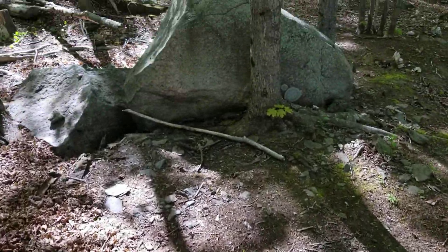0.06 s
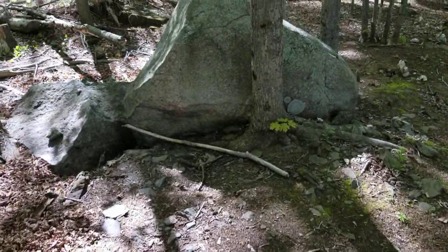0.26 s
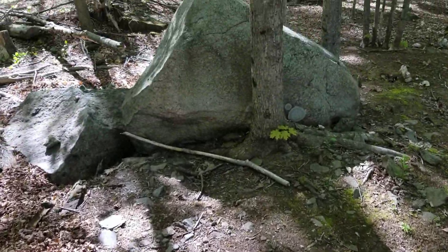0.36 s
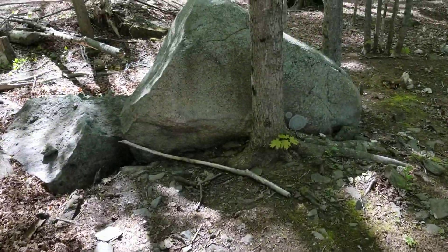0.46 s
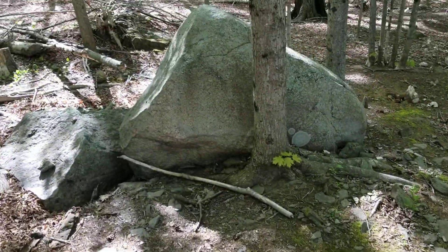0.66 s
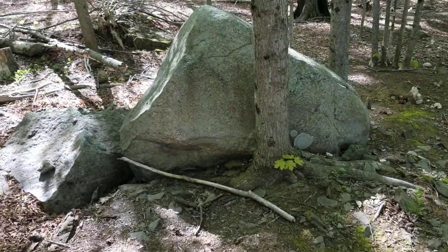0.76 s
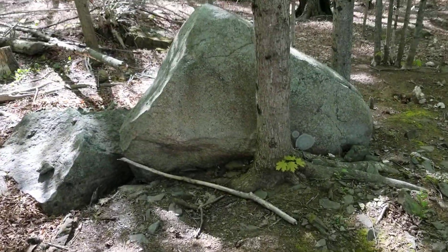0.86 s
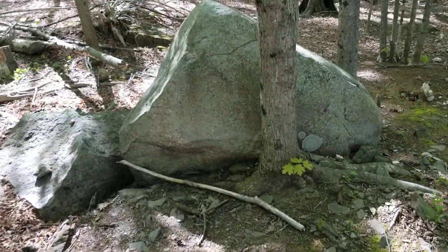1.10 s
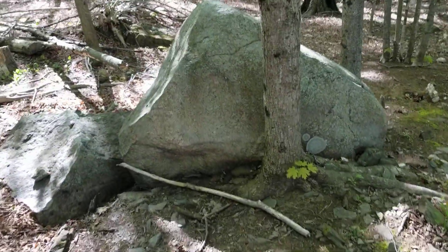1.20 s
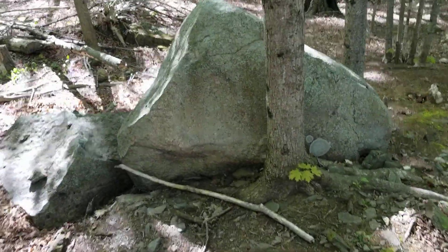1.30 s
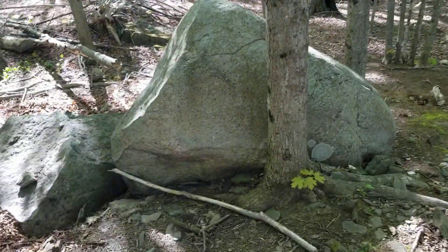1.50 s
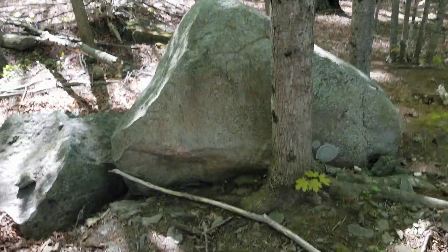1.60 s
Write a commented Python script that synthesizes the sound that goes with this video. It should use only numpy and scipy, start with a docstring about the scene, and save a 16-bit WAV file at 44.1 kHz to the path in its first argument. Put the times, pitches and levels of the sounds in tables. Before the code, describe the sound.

A dry stick snaps sharply underfoot, then a step crunches through dead leaves.

```python
"""Woodland floor, over a low rumble of air and a faint hiss. Leaves stir; at 0.22 s a dry stick breaks
under a boot near the left microphone: quick fractures, a short ring, the crack thrown back by the trees.
The leaves settle, and from 0.4 s a far songbird slurs a few faint notes. From 1.05 s the next step
swishes through the litter, crunches down on it and snaps small twigs."""
import sys
import numpy as np
from scipy import signal
from scipy.fft import rfft, irfft
from scipy.io import wavfile
from scipy.ndimage import map_coordinates

SR = 44100
rng = np.random.default_rng(int(sys.argv[2]) if len(sys.argv) > 2 else 0)


def transcribe(signal):
    """Save signal, clipped to [-1, 1], as a 16-bit WAV file at the path in sys.argv[1]."""
    frames = np.atleast_2d(signal).T
    limited = np.clip(frames, -1, 1)
    pcm = np.round(limited * 32767).astype(np.int16)
    wavfile.write(sys.argv[1], SR, pcm)


N = 72765
TOP_HZ = 15750
STICK_LAG_S, LEAF_LAG_S, SOLE_LAG_S = -0.000068, 0.00014, 0.00008  # left microphone behind right when positive, ahead when negative


def undb(db):
    """Decibels to gain."""
    return 10 ** (np.asarray(db) / 20)


def seconds():
    """Time of every sample."""
    return np.arange(N) / SR


def convolve(x, response):
    """Pass a sound through an impulse response."""
    return irfft(rfft(x, 2 * N) * rfft(response, 2 * N))[..., :N]


def colour(x, points, keep_power=True, size=4096):
    """Minimum-phase filter through (freq_hz, gain_db) points; keep_power uses their shape only."""
    hz, db = np.array(points, float).T
    bins_hz = np.fft.rfftfreq(size, 1 / SR)
    gain = undb(np.interp(np.log(bins_hz + 1), np.log(hz), db))
    if keep_power:
        gain = gain / np.sqrt(np.mean(gain ** 2 * (bins_hz < TOP_HZ)))
    causal_fold = np.r_[1, np.full(size // 2 - 1, 2), 1, np.zeros(size // 2 - 1)]
    cepstrum = irfft(np.log(gain)) * causal_fold
    return convolve(x, irfft(np.exp(rfft(cepstrum))))


def reflection_envelope(t60_s, rise_s):
    """Reflections build up, then die away."""
    t = seconds()
    return np.exp(-np.log(1000) * t / t60_s) * (1 - np.exp(-t / rise_s))


def tail(t60_s, rise_s):
    """Diffuse reflections of unit energy, unrelated left and right."""
    response = rng.standard_normal((2, N)) * reflection_envelope(t60_s, rise_s)
    return response / np.sqrt(np.sum(response ** 2, axis=1, keepdims=True))


def scatter(x, t60_s, rise_s):
    """Countless reflections: a sound's energy lingers as a diffuse wash."""
    linger = reflection_envelope(t60_s, rise_s) ** 2
    power = convolve(x ** 2, linger / linger.sum())
    return rng.standard_normal((2, N)) * np.sqrt(abs(power))


def mic_pair(x, lag_s):
    """Direct sound reaches the right microphone lag_s before the left."""
    return np.array([x, map_coordinates(x, [(seconds() + lag_s) * SR])])


def in_woods(x, lag_s, ground_db, trees_db):
    """Direct sound plus scatter off the ground and the trees."""
    ground = undb(ground_db) * scatter(x, t60_s=0.039, rise_s=0.00066)
    trees = undb(trees_db) * scatter(x, t60_s=0.59, rise_s=0.021)
    return mic_pair(x, lag_s) + ground + trees


def bursts(rows, decay_s):
    """One sudden, decaying noise burst per fracture or impact."""
    t, out = seconds(), np.zeros(N)
    for start_s, level_db in rows:
        envelope = (t >= start_s) * np.exp(-abs(t - start_s) / decay_s)
        burst = envelope * rng.standard_normal(N)
        out += undb(level_db) * burst * np.sqrt(np.sum(envelope ** 2) / np.sum(burst ** 2))
    return out


def grains(pushes, peak_per_s, spread_db):
    """Tiny uneven clicks; each push of the boot makes them denser and louder."""
    t, power = seconds(), 0
    for peak_s, rise_s, decay_s, level_db in pushes:
        falloff = np.where(t < peak_s, ((t - peak_s) / rise_s) ** 2, (t - peak_s) / decay_s)
        power += undb(level_db) ** 2 * np.exp(-2 * falloff)
    chance = np.clip(peak_per_s / SR * (power / power.max()) ** 0.15, 1e-6, 1)
    size = undb(spread_db * np.minimum(rng.exponential(size=N), 4.5))
    size /= np.sqrt(np.mean(size ** 2))
    clicks = (rng.random(N) < chance) * rng.choice([-1, 1], N) * size
    return clicks * np.sqrt(power / chance)


def air():
    """Low rumble, mostly common to both microphones and swelling at the end; faint forest hiss."""
    # spectra: freq_hz, gain_db
    rumble_spectrum = [(20, -6.5), (45, -4.5), (75, -0.5), (110, -2), (170, -13.5), (300, -21.5),
                       (700, -35), (2000, -49)]
    hiss_spectrum = [(100, -16), (600, -14), (1400, -15), (2100, -17), (2700, -10.5), (3300, -8.5),
                     (4000, 3), (4800, -1.5), (6000, 2.5), (7400, -4.5), (8400, -15.5), (11000, -10),
                     (14500, -6.5)]
    # rumble swell: time_s, level_db
    swell = [(0, -65), (.6, -67.5), (1.15, -69), (1.38, -65.5), (1.65, -59.5)]
    swell_db = np.interp(seconds(), *np.array(swell).T)
    rumble = colour(rng.standard_normal(N) + undb(-6) * rng.standard_normal((2, N)), rumble_spectrum)
    hiss = colour(rng.standard_normal((2, N)), hiss_spectrum)
    return undb(swell_db) * rumble + undb(-63) * hiss


def bird(waver_depth=0.01126, waver_step_s=0.003):
    """Slurred, slightly rough whistles far to the right, blurred by the wood."""
    # whistles: start_s, length_s, first_hz, middle_hz, last_hz, relative_db
    notes = [(.435, 0.042, 5200, 4520, 4050, -58), (0.611, 0.04, 5540, 5320, 5460, -59),
             (0.635, 0.045, 5490, 4380, 3910, -53.5), (0.763, 0.037, 3990, 4576, 3880, -54.5),
             (0.804, .05, 3900, 3390, 2990, -61), (0.926, 0.03, 5830, 5400, 5200, -54.5),
             (0.969, 0.037, 5530, 4380, 4040, -50.5), (1.575, 0.036, 5400, 5300, 5340, -51),
             (1.614, 0.038, 5400, 4370, 4030, -51)]
    t, song = seconds(), 0
    knots_s = np.arange(0, t[-1], waver_step_s)
    waver = 1 + waver_depth * np.interp(t, knots_s, rng.standard_normal(N)[:len(knots_s)])
    for start_s, length_s, first_hz, middle_hz, last_hz, relative_db in notes:
        progress = np.clip((t - start_s) / length_s, 0, 1)
        slur = np.polyfit([0, 0.5, 1], [first_hz, middle_hz, last_hz], 2)
        pitch_hz = np.polyval(slur, progress) * waver
        envelope = undb(relative_db) * np.sqrt(abs(np.sin(np.pi * progress)))
        song += envelope * np.sin(2 * np.pi * np.cumsum(pitch_hz) / SR)
    blur = convolve(song, tail(t60_s=0.51, rise_s=0.0022))
    return (undb(-3) * song + blur) * undb([[-5], [1.5]])


def knocks(decay_cycles=1.15):
    """The sole meets soil and roots: dull thumps of a cycle or two."""
    # thumps: start_s, pitch_hz, level_db
    thumps = [(.166, 295, -58), (0.225, 101, -52), (0.226, 297, -31), (.286, 636, -40), (.342, 367, -50),
              (1.086, 156, -57), (1.214, 447, -53), (1.298, 790, -36), (1.362, 300, -49),
              (1.385, 49.7, -49), (1.393, 405, -44.5), (1.4586, 457, -35.5), (1.484, 860, -36.5),
              (1.634, 187, -44.5), (1.643, 455, -39.5)]
    out = 0
    for start_s, pitch_hz, level_db in thumps:
        cycles = pitch_hz * np.maximum(seconds() - start_s, 0)
        out += undb(level_db) * np.sin(2 * np.pi * cycles) * np.exp(-cycles / decay_cycles)
    return mic_pair(out, SOLE_LAG_S)


def leaves():
    """Leaves brushed by the boot: dense clicks merge into a swish."""
    # brush strokes: peak_s, rise_s, decay_s, relative_db
    swishes = [(0, .02, 0.041, -50.5), (.13, 0.061, .09, -53.5), (.1845, .002, 0.017, -41.5),
               (.46, 0.064, 0.068, -50), (.54, 0.077, 0.073, -49), (1.06, 0.028, 0.025, -56),
               (1.083, 0.0025, 0.017, -36.5), (1.098, 0.016, 0.044, -36.5), (1.197, 0.029, 0.041, -39.5),
               (1.236, 0.016, 0.018, -32.5), (1.292, 0.022, 0.054, -35), (1.334, .01, 0.015, -32),
               (1.41, 0.014, 0.025, -40), (1.445, .025, 0.13, -39), (1.498, 0.031, 0.036, -36),
               (1.566, 0.0088, 0.017, -45), (1.645, 0.0092, 0.061, -51)]
    # leaf spectrum: freq_hz, gain_db
    spectrum = [(100, -17), (600, -33), (1200, -21.5), (2000, -13.5), (2700, -10), (3700, -4.5),
                (5300, 1.5), (6800, -1), (8600, -12.5), (11000, -3), (14500, 1)]
    clicks = grains(swishes, peak_per_s=7000, spread_db=3.5)
    return undb(-1.5) * colour(in_woods(clicks, LEAF_LAG_S, ground_db=-2, trees_db=-8.5), spectrum)


def litter():
    """Litter crushed under the sole: sparser, darker clicks."""
    # pushes of the sole: peak_s, rise_s, decay_s, level_db
    crunches = [(.21, 0.012, 0.21, -66), (.51, 0.077, 0.058, -68), (1.042, 0.0047, .04, -70),
                (1.095, 0.018, 0.076, -61), (1.172, 0.0045, 0.069, -55), (1.242, 0.019, 0.027, -48.5),
                (1.299, 0.037, 0.016, -47.5), (1.332, 0.011, 0.025, -46.5), (1.393, 0.0089, 0.0226, -43.5),
                (1.485, 0.028, 0.052, -45), (1.565, 0.0062, 0.024, -49.5), (1.645, 0.023, .03, -53)]
    # crunch spectrum: freq_hz, gain_db
    spectrum = [(60, -16), (150, -3), (300, -3), (600, 0), (1200, 1.5), (2000, -5.5), (2600, 3), (4000, -4),
                (8000, -6), (15000, -44)]
    clicks = grains(crunches, peak_per_s=3800, spread_db=2.5)
    return colour(in_woods(clicks, SOLE_LAG_S, ground_db=-9.5, trees_db=-15), spectrum)


def twigs():
    """Small twigs snap, each a brief burst of tearing fibres."""
    # snaps: start_s, relative_db
    fractures = [(.057, -43.5), (.137, -46.5), (.151, -54), (.184, -45), (.188, -63), (.774, -49.5),
                 (1.072, -43.5), (1.129, -34), (1.3203, -21), (1.3285, -17), (1.330, -16), (1.3322, -20.5),
                 (1.334, -32), (1.418, -29), (1.433, -33), (1.4437, -32), (1.484, -30), (1.4968, -17.5),
                 (1.4995, -30), (1.508, -31), (1.5405, -30), (1.563, -28.5), (1.589, -33)]
    # snap spectrum: freq_hz, gain_db
    spectrum = [(100, -26), (300, -14.5), (1100, -11.5), (2500, -7), (3700, -9), (4600, 3), (5700, 4.5),
                (6800, 0), (8600, -10.5), (11000, -2.5), (14500, -3.5)]
    snaps = bursts(fractures, decay_s=0.0011)
    return undb(-2) * colour(in_woods(snaps, LEAF_LAG_S, ground_db=-1, trees_db=-11), spectrum)


def stick(far_mic_db=-8.5):
    """The stick fractures and rings, its halves kick the soil; ground and trees return the crack."""
    # fibres tearing, halves hitting soil: start_s, level_db
    fractures = [(.2225, -10.5), (.2234, -7), (.2247, -9.5), (.2264, -8.5), (.2275, -19), (.2288, -49)]
    kicks = [(.2226, -38), (.2263, -31)]
    # stick resonances: pitch_hz, level_db, t60_s
    modes = [(282, -56, 0.039), (3230, -44, 0.11), (3800, -21.5, 0.049), (5300, -35, 0.14),
             (6130, -26, 0.042), (6930, -28, .06)]
    # spectra: freq_hz, gain_db
    crack_spectrum = [(100, -19.5), (280, -3), (600, -13.5), (1200, -16.5), (2000, -12.5), (3500, 4),
                      (5400, 4), (7000, 0), (9000, -4), (11000, -5), (14500, -4)]
    kick_spectrum = [(80, -11), (270, 16), (450, -0.5), (750, -6.5), (1300, -5), (2500, -2), (6000, -23)]
    ground_spectrum = [(100, -26), (600, -26), (2000, -24), (3600, -4), (4500, -15), (5400, 0),
                       (6800, -1.5), (8600, -8), (11000, -3), (14500, 2.5)]
    trees_spectrum = [(100, -22), (600, -17), (1900, -18), (2700, -11.5), (4400, -5.5), (5400, -1.5),
                      (6800, -2), (8600, -10.5), (11000, -7.5), (14500, -5)]
    crack = bursts(fractures, decay_s=0.001)
    direct = mic_pair(colour(crack, crack_spectrum), STICK_LAG_S) * undb([[0], [far_mic_db]])
    age_s = np.maximum(seconds() - fractures[0][0], 0)
    ring = 0
    for pitch_hz, level_db, t60_s in modes:
        envelope = undb(level_db) * np.exp(-np.log(1000) * age_s / t60_s)
        ring += envelope * np.sin(2 * np.pi * pitch_hz * age_s)
    thud = colour(bursts(kicks, decay_s=0.0032), kick_spectrum)
    ground = undb(-2) * colour(scatter(crack, t60_s=0.087, rise_s=0.003), ground_spectrum)
    trees = undb(-12) * colour(scatter(crack, t60_s=0.51, rise_s=0.0089), trees_spectrum)
    return direct + mic_pair(ring + thud, STICK_LAG_S) + ground + trees


def scene():
    """All sources at the two microphones."""
    return stick() + twigs() + litter() + leaves() + knocks() + bird() + air()


def record(dry):
    """The right microphone faces away and is duller; peaks are rounded, the top is cut."""
    # right microphone response: freq_hz, gain_db
    off_axis = [(100, 0), (1200, -1.5), (2400, 0), (4400, -1.5), (5500, 2.5), (6800, -11), (8600, -8.5),
                (11000, -6), (14500, -16.5)]
    ceiling = 1.3
    heard = np.array([dry[0], colour(dry[1], off_axis, keep_power=False)])
    rounded = ceiling * np.tanh(heard / ceiling)
    lowpass = signal.ellip(10, 0.2, 80, TOP_HZ, fs=SR, output="sos")
    return signal.sosfilt(lowpass, rounded)


dry = scene()
out = record(dry)
transcribe(out)
```